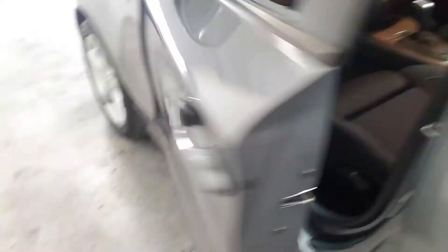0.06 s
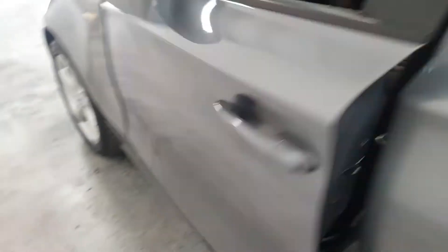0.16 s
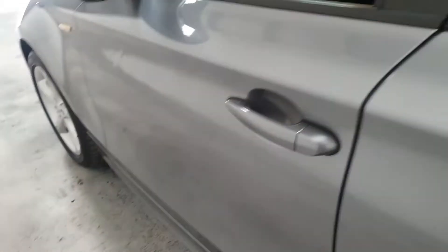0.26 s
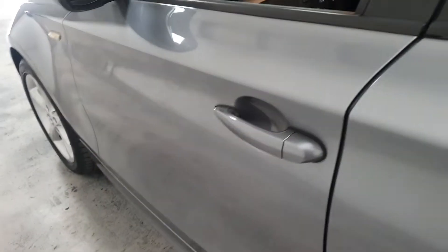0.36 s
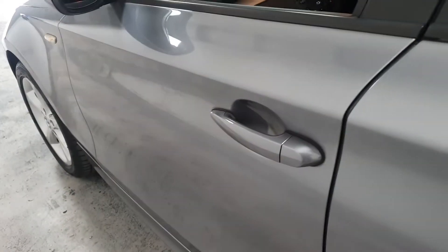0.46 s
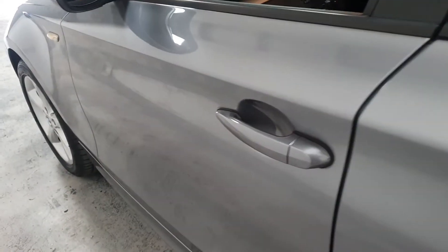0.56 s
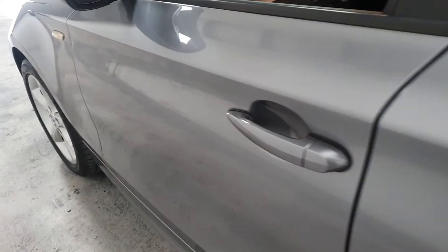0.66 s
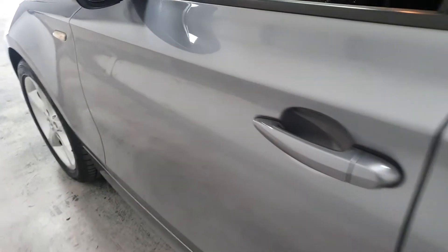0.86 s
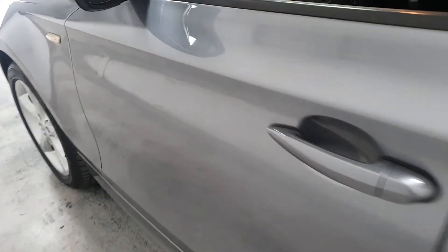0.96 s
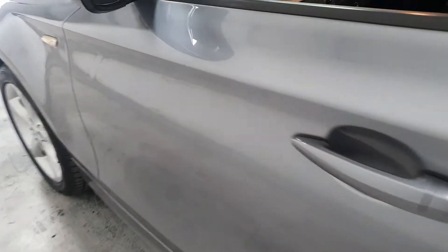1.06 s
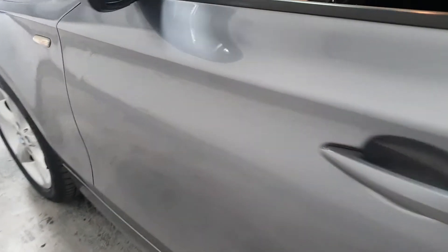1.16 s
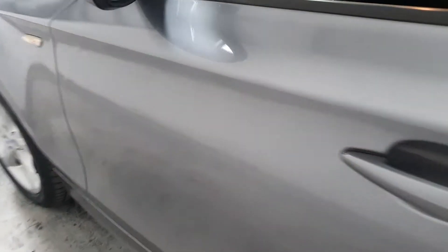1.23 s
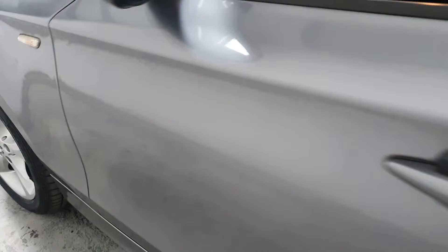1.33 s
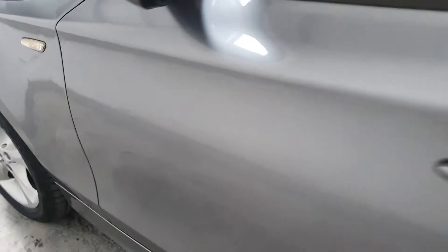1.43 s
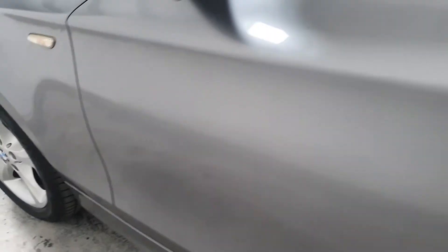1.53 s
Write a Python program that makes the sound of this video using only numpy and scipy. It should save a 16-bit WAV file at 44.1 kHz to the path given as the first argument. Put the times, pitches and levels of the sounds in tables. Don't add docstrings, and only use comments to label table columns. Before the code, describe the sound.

After a brief grainy scuff, a car door shuts hard with a clicking latch and deep body thump; low thumps and reverberation die away in a concrete hall over faint engine idle and hum, heard close on a phone.

```python
import sys
import numpy as np
from scipy import signal
from scipy.fft import rfft, irfft
from scipy.io import wavfile
from scipy.ndimage import uniform_filter1d

SR = 44100
rng = np.random.default_rng(int(sys.argv[2]) if len(sys.argv) > 2 else 0)


def convert_level_to_amplitude(level_db):
    exponent = np.asarray(level_db, float) / 20
    return 10 ** exponent


def master_out(mix):
    frames = np.transpose(np.atleast_2d(mix))
    ceiling = np.clip(frames, -1, 1)
    pcm = np.round(ceiling * 32767).astype(np.int16)
    wavfile.write(sys.argv[1], SR, pcm)


N = 68355
HALF_OCTAVES = 40 * 2 ** np.arange(0, 8.7, 0.5)
THIRD_OCTAVES = 125 * 2 ** np.arange(0, 7.1, 1 / 3)
FALL_BEND_DB = 6
LEFT_RIGHT = np.array([[1.0], [-1.0]])


def read(table, hz, col=1):
    table = np.array(table)
    return np.interp(np.log(hz), np.log(table[:, 0]), table[:, col])


def ring(push, hz, t60, turn=0):
    pole = np.exp(2j * np.pi * hz / SR - np.log(1000) / (t60 * SR))
    swing = signal.lfilter([1], [1, -pole], push)
    return (swing * np.exp(1j * turn)).imag


def band(hz, octaves=0.58):
    f = np.arange(N // 2 + 1) * SR / N + 1
    shape = np.exp(-(np.log2(f / hz) / octaves) ** 2 * 2)
    mid, side = irfft(rfft(rng.standard_normal((2, N))) * shape, N)
    width = np.clip(hz / 800, 0.11, 1) ** 1.2
    noise = mid + width * side * LEFT_RIGHT
    return noise / np.std(noise)


def walk(rate):
    k = int(SR / rate)
    steps = np.repeat(rng.standard_normal(N // k + 1), k)
    return 1.3 * uniform_filter1d(uniform_filter1d(steps, k), k)[:N]


def burst(t, start, length):
    return (t >= start) * np.exp(-np.maximum(t - start, 0) / length)


def contact(t, start, length):
    return np.pi * np.clip((t - start) / length, 0, 1)


def thump(t, s, db, hz, cycles):
    swell = np.exp(-((t - s) * hz / cycles) ** 2)
    return convert_level_to_amplitude(db) * swell * np.sin(2 * np.pi * hz * (t - s))


# time in seconds, level in dB.
RUSH_LEVEL = [
    (0.0, -34),
    (0.07, -32.5),
    (0.21, -40),
]
# pitch in Hz, level in dB per Hz.
RUSH_COLOUR = [(120, -36), (250, -17), (580, -6), (800, -6.5), (930, 5), (1250, 0), (1750, 1), (2400, -0.5),
               (5500, -8.5), (15800, -26.5)]


def rush(t):
    s, db = np.array(RUSH_LEVEL).T
    shape_db = np.interp(t, s, db) - db.max()
    since = np.maximum(t - s[-1], 0)
    scrape = 0
    for hz in THIRD_OCTAVES:
        fade = shape_db * (1.4 if hz > 6000 else 1)
        tail = -60 * since / read(HALL_MODES, hz, col=2) - FALL_BEND_DB * t ** 2
        colour = read(RUSH_COLOUR, hz) + 10 * np.log10(hz / 6000)
        grain = 1.2 * walk(49)
        scrape = scrape + band(hz, 1 / 3) * convert_level_to_amplitude(colour + fade + tail + grain)
    scrape = scrape + convert_level_to_amplitude(-4 + 3.8 * shape_db - 100 * since) * band(1700, 0.35)
    swing_air = convert_level_to_amplitude(-42.5 - 60 * t / 2.0) * band(60, 1.0)
    return scrape * convert_level_to_amplitude(db.max()) + swing_air


# pitch in Hz, level in dB per Hz.
HISS_COLOUR = [(120, -5.5), (250, -3.5), (450, -15), (820, -10.5), (1400, -22), (6500, -20), (8500, -32),
               (15800, -36.5)]
# time in seconds, pitch in Hz, level in dB, level an octave up in dB.
HUM = [
    (0, 157, -58.5, -60.5),
    (0.851, 157.4, -69.5, -70),
    (1.1, 158.4, -68, -76),
    (1.2, 162.5, -71, -89),
    (1.38, 163.4, -80, -87),
    (1.501, 174.6, -73.5, -90),
    (1.55, 173.1, -64.5, -98),
]
# time in seconds, level in dB, pitch in Hz.
RUSTLES = [
    (1.167, -62, 1000),
    (1.352, -76, 4500),
    (1.375, -82, 4000),
    (1.415, -82, 3000),
]


def hiss():
    noise = sum(band(hz) * convert_level_to_amplitude(read(HISS_COLOUR, hz) + 10 * np.log10(hz) + walk(10))
                for hz in HALF_OCTAVES[3:])
    return noise / noise.std() * convert_level_to_amplitude(-78)


def idle_engine():
    turns = np.cumsum(21.6 * (1 + 0.1 * walk(12))) / SR
    kicks = np.diff(np.floor(turns), prepend=0) * convert_level_to_amplitude(3 * walk(30))
    engine = ring(kicks, 67, 0.06)
    return engine / engine.std() * convert_level_to_amplitude(-69.5)


def machine_hum(t):
    s, hz, db, octave_db = np.array(HUM).T
    phase = 2 * np.pi * np.cumsum(np.interp(t, s, hz) * (1 + 0.012 * walk(50))) / SR
    wobble = convert_level_to_amplitude(2.5 * walk(40))
    note = convert_level_to_amplitude(np.interp(t, s, db)) * np.sin(phase)
    octave = convert_level_to_amplitude(np.interp(t, s, octave_db)) * np.sin(2 * phase)
    return 1.1 * wobble * (note + octave)


def background(t):
    rumble = convert_level_to_amplitude(-75) * band(81, 0.81)
    traffic = convert_level_to_amplitude(-59 - 81 * (1.79 - t)) * band(762.6, 0.91)
    rustle = sum(convert_level_to_amplitude(db) * np.exp(-((t - s) / 0.0054) ** 2) * band(hz, 1.458) for s, db, hz in RUSTLES)
    return hiss() + idle_engine() + rumble + machine_hum(t) + traffic + rustle


# time in seconds, level in dB, pitch in Hz.
LOW_THUMPS = [(.028, -39.5, 58), (.085, -51, 55), (.127, -41.5, 78), (0.163, -44, 55), (.30, -22, 55),
              (.372, -23, 52), (.42, -26, 62), (.47, -30, 45), (.555, -34, 62), (.668, -40, 55),
              (.745, -51, 50), (.815, -54, 60), (0.884, -55.5, 68), (.94, -50.5, 56), (1.178, -57.5, 54),
              (1.276, -60.5, 69.9), (1.325, -65.5, 55)]


def low_thumps(t):
    cabin_air = thump(t, 0.2612, -8, 74, 0.95)
    return cabin_air + sum(thump(t, *row, 1.1) for row in LOW_THUMPS)


# time in seconds, level in dB, brightness from -1 to 1,
# left over right in dB.
LATCH_TOUCHES = [
    (0.2183, -18, 0.34, -3),
    (.2195, -14.5, 0.74, -18.5),
    (0.2208, -9.5, .4, -4),
    (.2221, -14, 0.54, 8.5),
    (.2233, -11, -0.55, -3),
    (0.2242, -11.5, 0.21, -1.5),
    (0.2301, -18.5, -.3, 4),
    (0.2311, -17.5, 0.00091, 6),
    (0.2328, -14, 0.16, -5.5),
]
# pitch in Hz, level in dB, time to fall 60 dB in seconds.
LATCH_MODES = [(498, -7, .05), (680, -10, 0.035), (940, -13, .02), (1197, -7.5, 0.024), (1380, -4.5, .02),
               (1700, -7.5, 0.013), (2170, -9, 0.0087), (2820, -8, 0.013), (3790, -2, 0.0086),
               (4350, -10.5, .01), (5200, -16, .008)]
# time in seconds, level in dB, length in seconds.
SNAPS = [
    (0.2175, -41.5, 0.00095),
    (0.2296, -26.5, .0015),
    (0.232, -18, .001),
    (.2350, -28.5, .004),
]


def latch(t):
    out = np.zeros((2, N))
    touch_s = 0.00018
    for s, db, bright, pan_db in LATCH_TOUCHES:
        tick = convert_level_to_amplitude(db) * np.sin(contact(t, s, touch_s)) ** 2 * 3 / (touch_s * SR)
        for k, (hz, mode_db, t60) in enumerate(LATCH_MODES):
            tilt = np.log2(hz / 1800)
            pan = LEFT_RIGHT * pan_db * (1 + tilt) / 4
            turn = np.array([[1.7 * min(hz / 2000, 1)], [0]])
            level = (-1) ** k * convert_level_to_amplitude(mode_db + 6 * bright * tilt + pan)
            out += level * ring(tick, hz, t60, turn)
    snaps = sum(convert_level_to_amplitude(db) * burst(t, s, length) for s, db, length in SNAPS) * band(5000, 4.5)
    buzz_start, buzz_length = 0.2505, 0.018
    buzz_shape = np.clip(1 - (2 * (t - buzz_start) / buzz_length - 1) ** 4, 0, 1)
    buzz = buzz_shape * convert_level_to_amplitude(-29 + 1.3 * walk(900)) * band(3000, 2.1)
    return out + (snaps + buzz) * convert_level_to_amplitude(-2.2 * LEFT_RIGHT)


# pitch in Hz, level in dB, time to fall 60 dB in seconds.
HALL_MODES = [(60, -24.5, 0.69), (150, -28, 0.88), (309.3, -27, .85), (510, -25.5, 1.178),
              (906, -35.5, 1.76), (1960, -37.5, 1.835), (4500, -37.5, 1.5), (12000, -51.5, 0.41)]


def hall(t):
    since = np.maximum(t - 0.222, 0)
    wash = 0
    for hz in HALF_OCTAVES:
        fall = 60 * since / read(HALL_MODES, hz, col=2) + FALL_BEND_DB * since ** 2
        wash = wash + band(hz) * convert_level_to_amplitude(read(HALL_MODES, hz) - fall)
    return wash * (1 - np.exp(-since / 0.02))


# time in seconds, level in dB, contact in seconds,
# push direction and strength.
BLOWS = [
    (0.2314, -18, 0.001, 0.89),
    (0.2332, -14, 0.003, -0.88),
    (.2400, -13, 0.0024, -1),
    (0.2477, -22, 0.0044, 0.71),
    (0.2539, -16, 0.0044, -1.2),
    (.2610, -10.5, 0.004, 0.84),
]
# pitch in Hz, level in dB, time to fall 60 dB in seconds.
BODY_MODES = [(52, -14, .5), (81, -13.5, .1), (114.73, -10, .3), (153.3, -5, .2), (175.9, -4, 0.62),
              (205, -6, .2), (274.7, -10.5, 0.43), (287.2, -10.5, 0.39), (422, -8, 0.89), (486.7, -14, 0.1),
              (591, -10, .25), (680, -15.5, .2)]


def thud(t):
    push = sum(way * convert_level_to_amplitude(db) * np.sin(contact(t, s, length)) / (length * SR)
               for s, db, length, way in BLOWS)
    out = 0
    for k, (hz, db, t60) in enumerate(BODY_MODES):
        turn = 0.12 * np.log2(hz / 30) * (-1) ** k * LEFT_RIGHT / 2
        out = out + convert_level_to_amplitude(db) * ring(push, hz, t60, turn)
    return out


def scene():
    t = np.arange(N) / SR
    return rush(t) + background(t) + low_thumps(t) + latch(t) + hall(t) + thud(t)


def roll_off(x):
    return signal.sosfilt(signal.butter(12, 15940, fs=SR, output="sos"), x)


# pitch in Hz, gain in dB.
MIC = [(6800, 0), (8200, -5.5), (15800, 1.5), (16200, -29.5)]


def record(dry):
    dry = signal.sosfilt(signal.butter(2, 37.5, "high", fs=SR, output="sos"), dry)
    hz = np.arange(N + 1) * SR / N / 2 + 1
    heard = irfft(rfft(dry, 2 * N) * convert_level_to_amplitude(read(MIC, hz)), 2 * N)[:, :N]
    mix = np.tanh(0.59 * heard) / 0.5
    return roll_off(mix)


dry = scene()
out = record(dry)
master_out(out)
```